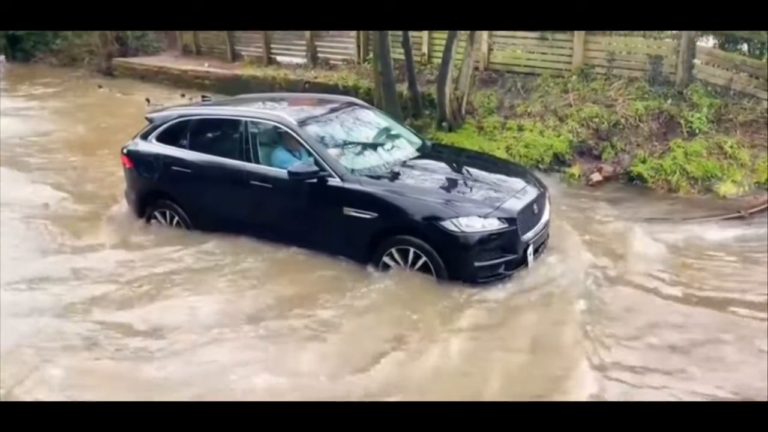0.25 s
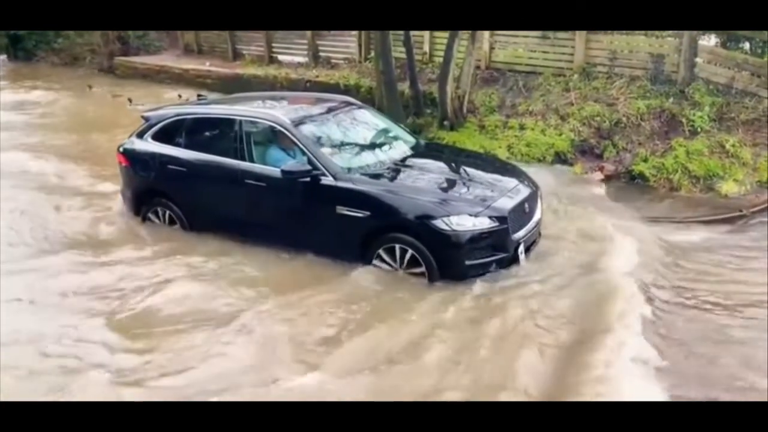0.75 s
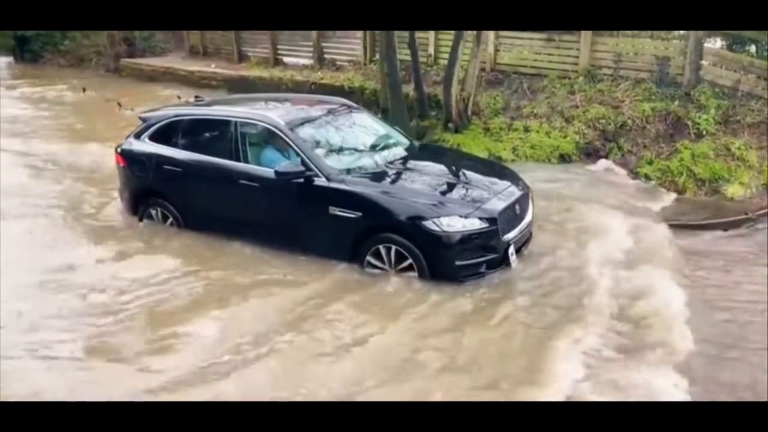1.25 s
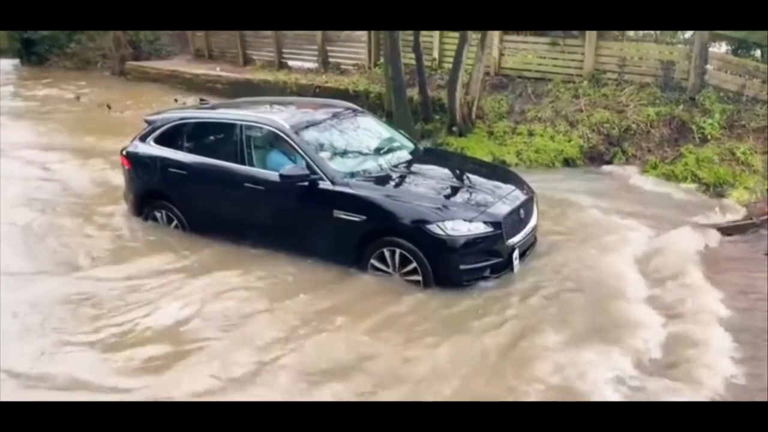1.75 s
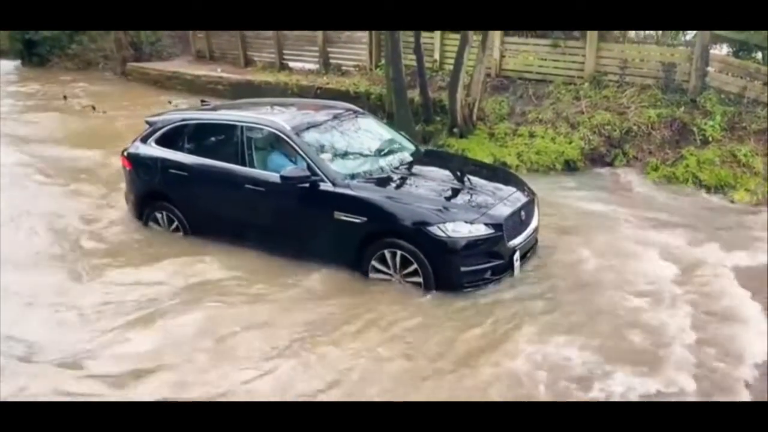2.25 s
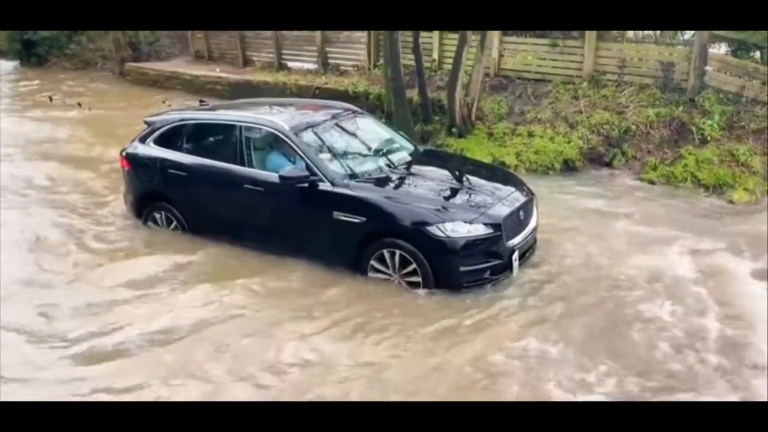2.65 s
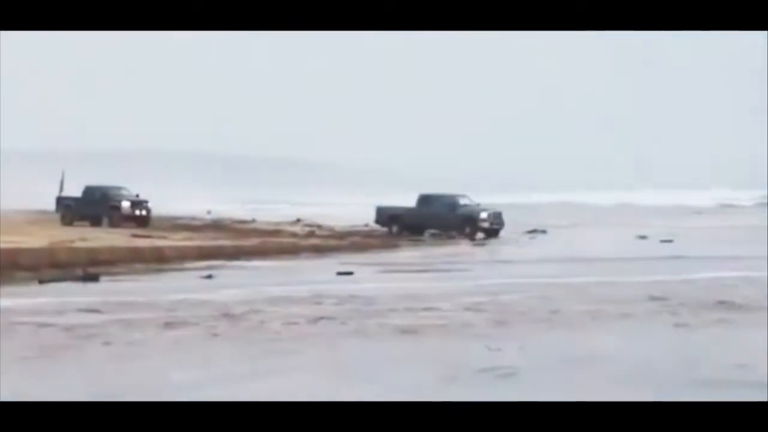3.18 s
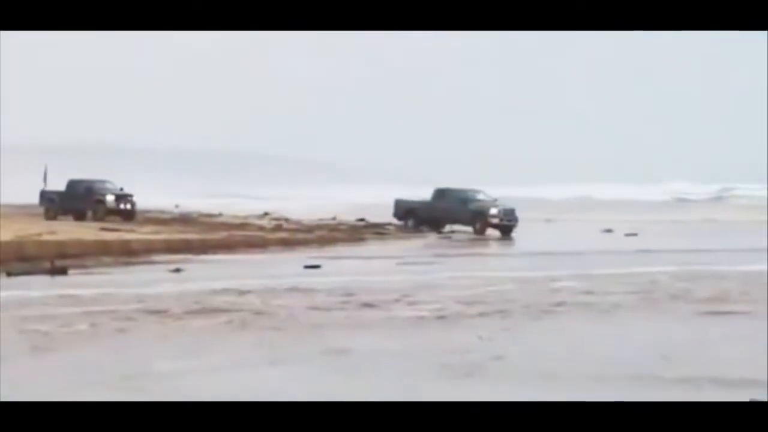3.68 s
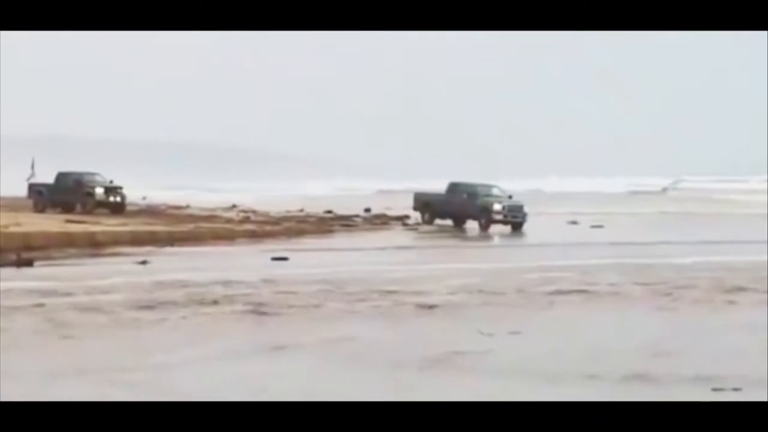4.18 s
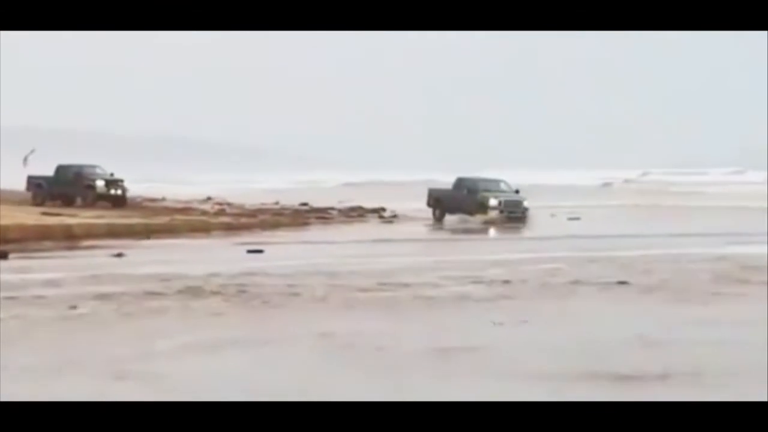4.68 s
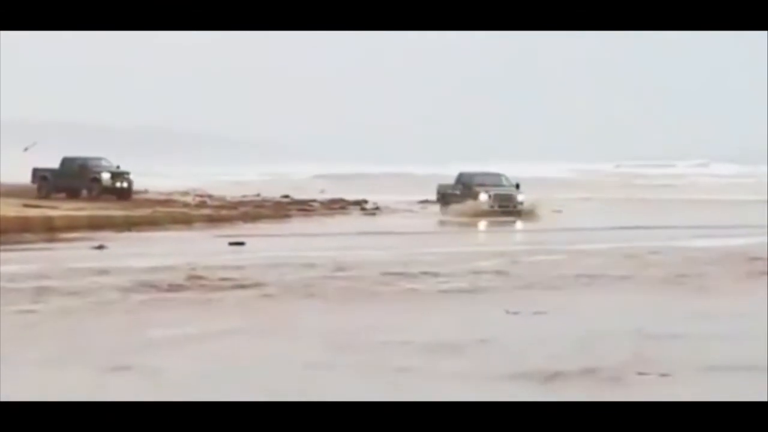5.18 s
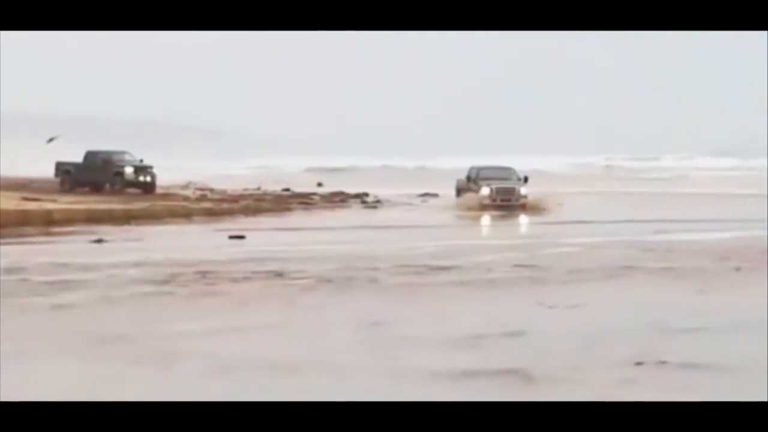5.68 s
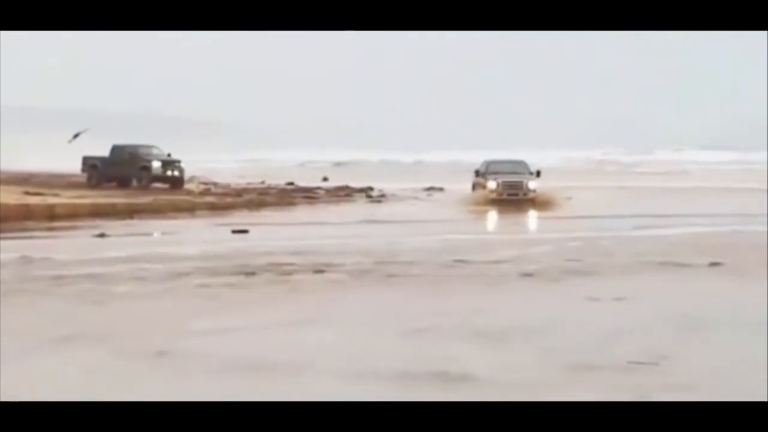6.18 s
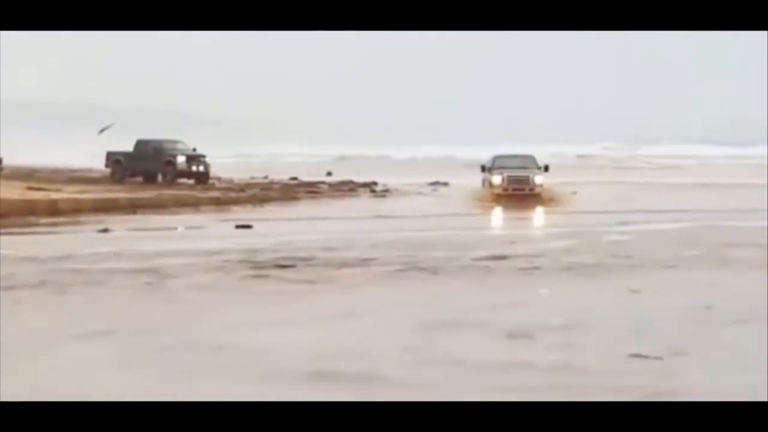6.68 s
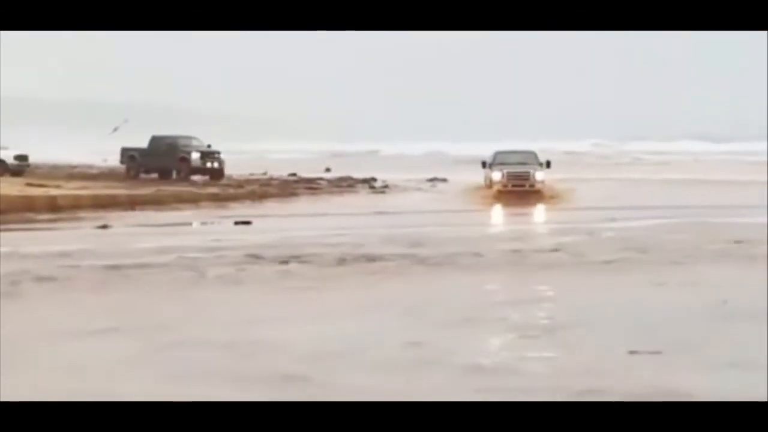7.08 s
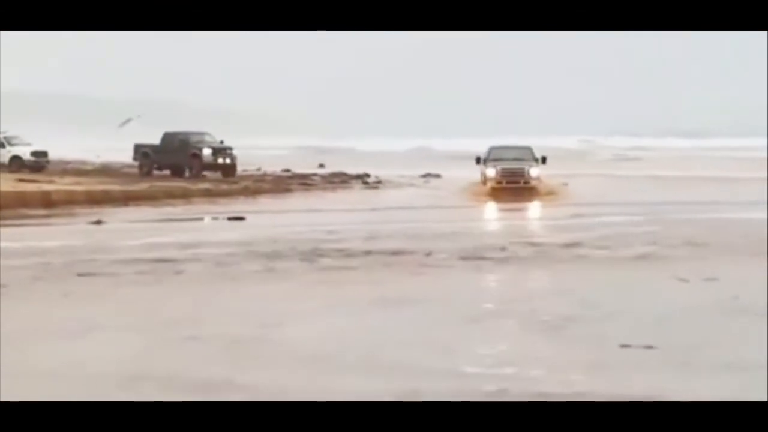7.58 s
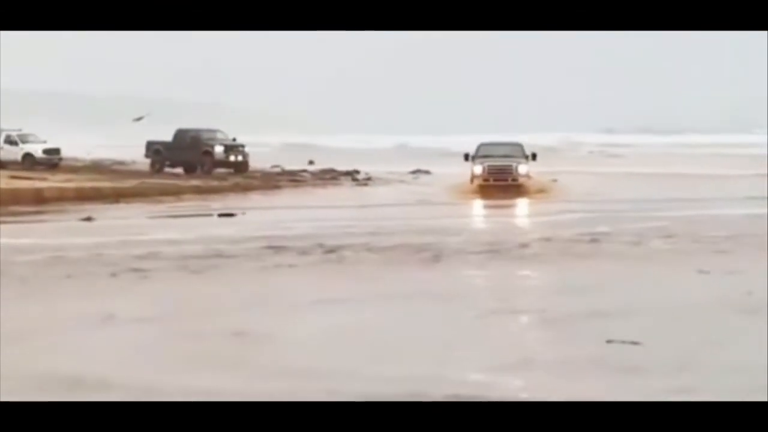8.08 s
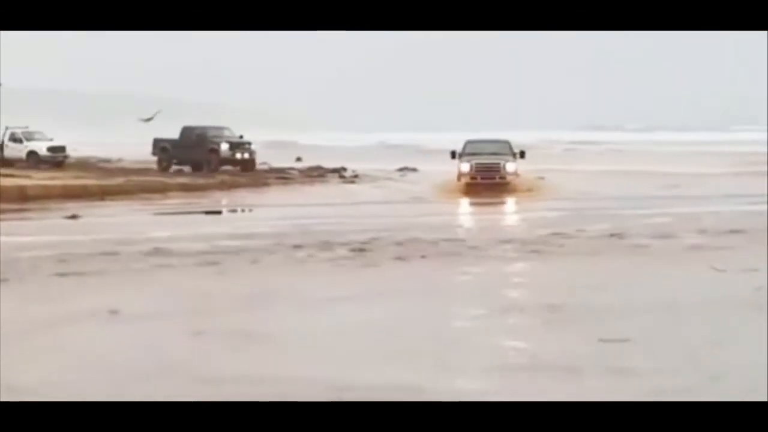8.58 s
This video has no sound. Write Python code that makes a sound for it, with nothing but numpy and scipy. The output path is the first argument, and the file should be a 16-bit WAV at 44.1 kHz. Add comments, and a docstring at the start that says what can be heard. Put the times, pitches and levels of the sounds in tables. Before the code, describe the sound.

A car wades through floodwater, churning and splashing, then wind and surf roar on a beach as a pickup engine hums nearer.

```python
"""A flooded road, microphone on the bank: a car wades through, and its bow wave churns, rushes and
sprays, with crests slapping down and air pockets gulping shut, then fades away.
Cut to a windy beach: wind and breakers roar while a distant pickup drives nearer through the shallows.
Its exhaust hum sinks, then climbs under load, with a second, steady engine behind it."""
import sys
import numpy as np
from scipy import signal
from scipy.fft import rfft, irfft, next_fast_len
from scipy.io import wavfile
from scipy.ndimage import uniform_filter1d, map_coordinates

SR = 44100
rng = np.random.default_rng(int(sys.argv[2]) if len(sys.argv) > 2 else 0)


def digitize_waveform(pressure):
    """Quantize a signal to 16-bit integers and store it at the path in sys.argv[1].

    Rows of a 2-D input are taken as channels; values are limited to [-1, 1].
    """
    field = np.atleast_2d(pressure).T
    bounded = np.clip(field, -1, 1)
    quanta = np.round(bounded * 32767).astype(np.int16)
    wavfile.write(sys.argv[1], SR, quanta)


N = 389844
TIME_S = np.arange(N) / SR


def amp(db):
    """Decibels to gain."""
    return 10 ** (np.asarray(db) / 20)


def unit(x):
    """Scale to rms 1."""
    return x / np.sqrt(np.mean(x ** 2) + 1e-20)


def along(points, hz):
    """Read (freq_hz, value) points on a log axis."""
    freqs, values = np.transpose(points)
    return np.interp(np.log(hz + 1), np.log(freqs + 1), values)


def curves(rows):
    """One value per sample for each column after the time."""
    times, *columns = np.transpose(rows)
    return [np.interp(TIME_S, times, column) for column in columns]


def wobble(rate):
    """A smooth random curve, rate knots a second."""
    return map_coordinates(rng.standard_normal(int(N * rate / SR) + 4), [TIME_S * rate])


def bump(crest_s, length_s):
    """A smooth rise from 0 to 1 and back."""
    return np.cos(np.pi * np.clip((TIME_S - crest_s) / length_s, -.5, .5)) ** 2


def swells(rows):
    """The dB that a series of swells adds to a level."""
    return sum(db * bump(crest_s, length_s) for crest_s, length_s, db in rows)


def filtered(x, response):
    """x times a complex response of frequency."""
    size = next_fast_len(N + SR // 2)
    return irfft(rfft(x, size) * response(np.fft.rfftfreq(size, 1 / SR)), size)[..., :N]


def patchy(depth_db, flutter_db):
    """Two noises sharing random patches of gain in time and pitch; the second also has its own."""
    spectra = signal.stft(rng.standard_normal((2, N)), nperseg=512)[2]
    patches = uniform_filter1d(rng.standard_normal(spectra.shape), size=4, axis=1)
    both, own = unit(uniform_filter1d(patches, size=8, axis=2))
    gains = amp([depth_db * both, depth_db * both + flutter_db * own])
    return np.array([unit(x) for x in signal.istft(spectra * gains, nperseg=512)[1][:, :N]])


def placed(pair, spectrum, width, side, lead):
    """Colour two unrelated signals and spread them over left and right, rms 1."""
    def colour(hz):
        angle = np.arctan(amp(along(width, hz)))
        return amp(along(spectrum, hz)) * [np.cos(angle), np.sin(angle)]
    common, apart = filtered(pair, colour)
    half = np.array([[.5], [-.5]])
    pan = lambda hz: amp(half * along(side, hz)) * np.exp(-1j * half * along(lead, hz))
    return unit(filtered(np.array([common + apart, common - apart]), pan))


def bubble(t, hz, cycles, rise):
    """A damped ring with a soft start; the pitch climbs as the bubble nears the surface."""
    age = t * hz / cycles
    phase = 2 * np.pi * hz * t * (1 + rise * np.minimum(age, 4) / 2)
    return np.sin(phase) * np.exp(-age) * (1 - np.exp(-5 * age))


def bubbles(count, pitch_hz, spread, cycles, scatter_db):
    """A stereo cloud of bubbles of random size, time and place, rms 1."""
    start, size, pan = rng.random((count, 3)).T[:, :, None]
    hz = np.clip(pitch_hz * np.exp(spread * rng.standard_normal((count, 1))), 200, 9500)
    n = np.arange(700)
    strength = amp(-scatter_db * np.log(size + 0.031))
    rings = bubble(n / SR, hz, cycles, rise=0.093) * (1 - n / len(n)) * strength
    index = ((start * N).astype(int) + n).ravel()
    sides = np.sqrt(1 - pan), np.sqrt(pan)
    return unit(np.array([np.bincount(index, (rings * gain).ravel(), N)[:N] for gain in sides]))


def knocks(rows, rise, rough):
    """Short low rings, each made ragged by turbulence."""
    out, t = np.zeros(N + SR), np.arange(SR // 4) / SR
    flutter = wobble(180)
    for start_s, hz, db, ring_s in rows:
        start = round(start_s * SR)
        ragged = 1 + rough * flutter[start:][:len(t)]
        out[start:][:len(t)] += amp(db) * bubble(t, hz, hz * ring_s, rise) * ragged
    return out[:N]


def engine(hz, db, orders, waver, shake_db):
    """Engine orders on a pitch and a level, with uneven speed and strength."""
    phase = 2 * np.pi * np.cumsum(hz * (1 + waver * wobble(25))) / SR
    return np.sqrt(2) * sum(amp(db + order_db + shake_db * wobble(18)) * np.sin(multiple * phase)
                            for multiple, order_db in orders)


# Stereo image from the bank of the ford
FORD_WIDTH = [(80, -3), (400, -6), (1000, 0), (1550, -10.5), (2600, -7.5), (5500, -2), (8000, -4.5)]  # freq_hz, unrelated_over_shared_db
FORD_BALANCE = [(100, 2.5), (330, 0), (700, -3.5), (1800, -1), (5500, -2.5), (9800, 0)]  # freq_hz, left_over_right_db
FORD_PHASE = [(90, 2.5), (330, 0.37), (900, 0.61), (1700, 2.08), (2100, 1.05), (3100, 2.27), (4200, 1.9),
              (5100, 3.1), (6000, 0.47), (7500, 1.2)]  # freq_hz, right_lead_rad
def at_ford(pair, spectrum):
    """Water noise as it reaches the microphone on the bank."""
    return placed(pair, spectrum, FORD_WIDTH, FORD_BALANCE, FORD_PHASE)


# Water in the wheel arches and troughs: crest_s, length_s, pitch_hz, level_db
SLOSHES = [(0.083, 0.18, 480, -41), (0.597, .24, 390, -45), (0.687, .12, 211, -39.5), (.75, 0.2, 440, -41),
           (0.917, .2, 280, -40.5), (1.59, .13, 280, -43.5), (1.907, 0.049, 660, -38),
           (1.988, 0.075, 270, -43), (2.1, .04, 190, -41)]
def sloshes(width_octaves=0.39, gurgle_db=1.5):
    """Water folds over a hollow: a short, gurgling rush around the hollow's pitch."""
    out = np.zeros((2, N))
    for crest_s, length_s, pitch_hz, db in SLOSHES:
        hollow = lambda hz: np.exp(-.5 * (np.log2((hz + 1) / pitch_hz) / width_octaves) ** 2)
        common, apart = unit(filtered(rng.standard_normal((2, N)), hollow))
        gurgle = amp(db - gurgle_db * np.tanh(wobble(54.7)))
        out += bump(crest_s, length_s) * gurgle * np.array([common + .4 * apart, common - .4 * apart])
    return out


# Air pockets in the wave: start_s, pitch_hz, level_db, ring_s
AIR_POCKETS = [(.038, 260, -27, 0.0069), (.05, 540, -31, .018), (.085, 426, -34, .018),
               (.106, 590, -32, 0.013), (.295, 195, -36, 0.0071), (.376, 170, -26.5, 0.012),
               (.398, 254, -32, 0.011), (.518, 174, -22, 0.0094), (.528, 270, -30, 0.0079),
               (.53, 670, -30, 0.013), (.571, 149, -34, .008), (.578, 270, -26, 0.0077),
               (.672, 153, -22, 0.0068), (.676, 270, -31, 0.009), (.716, 115, -28, .009),
               (.785, 468, -31, 0.01), (.89, 297, -34, 0.012), (1.083, 215, -33, .009),
               (1.325, 265, -33, 0.0088), (1.352, 205, -34, .01), (1.575, 285, -36, .018),
               (1.733, 271, -31, .006), (1.812, 135, -37, .01), (1.898, 648, -28, 0.015),
               (1.981, 320, -35, 0.011), (2.022, 150, -35, 0.011), (2.088, 124, -32, .012),
               (2.094, 243, -37, .009), (2.18, 163, -41, 0.024), (2.258, 300, -43, .009)]
def gulps(reverb_s=0.2):
    """Air pockets ring as they close and linger between the banks."""
    rings = knocks(AIR_POCKETS, rise=0.027, rough=0.16)
    t = np.arange(SR // 4) / SR
    banks = rng.standard_normal((2, len(t))) * amp(-60 * t / reverb_s)
    echo = signal.fftconvolve(rings[None], banks / np.linalg.norm(banks[0]), axes=1)[:, :N]
    return rings + amp(-13) * echo


SLAPS = [(.145, -43), (.525, -33), (.705, -32.5), (.745, -41), (.805, -38), (1.37, -41)]  # toppling crests: peak_s, level_db
SLAP_SPECTRUM = [(300, -16), (700, 4), (1100, 3), (1550, 1), (2100, -5), (3000, -10), (4300, -2),
                 (5900, -4), (7000, -17), (9800, -11)]  # their hiss: freq_hz, density_db
def slaps(attack_s=0.018, decay_s=0.053):
    """A crest falls back on the water: a quick burst of hiss and droplets."""
    burst = sum(amp(db) * np.exp(-np.maximum((peak_s - TIME_S) / attack_s, (TIME_S - peak_s) / decay_s))
                for peak_s, db in SLAPS)
    sheet = at_ford(patchy(1, flutter_db=1), SLAP_SPECTRUM)
    droplets = bubbles(count=7000, pitch_hz=2600, spread=0.48, cycles=1.7, scatter_db=4)
    return burst * (sheet + amp(-11) * droplets)


# Waves heaving against the car's body: crest_s, length_s, swell_db
HEAVES = [(.175, 0.13, 10), (.295, .17, 13.5), (.39, 0.11, 15), (.55, 0.25, 11.5), (.69, 0.14, 14.5),
          (.84, 0.13, 10), (1.06, 0.26, 11), (1.22, 0.11, 11), (1.35, .2, 9), (1.6, .22, 5),
          (1.77, 0.24, 11), (2.04, .24, 5)]
# The wave's three layers, heard from the bank: freq_hz, density_db
CHURN_SPECTRUM = [(20, -28), (45, -6.5), (75, 0), (130, -3.5), (220, -15), (400, -27), (900, -60)]
WASH_SPECTRUM = [(95, -26), (195, 0), (270, -1.5), (480, -3), (660, -2.5), (1000, -2.5), (1250, -6.5),
                 (1520, -0.5), (1750, -7), (2050, -4), (2400, -12.5), (2800, -6.5), (3500, -22),
                 (7000, -62)]
SPRAY_SPECTRUM = [(1200, -36), (2500, -19), (3200, 1), (4300, 1.5), (4900, 0.5), (5700, 1), (6800, -5.5),
                  (8500, -7), (9800, -6)]
def bow_wave(break_s=0.7, build_db_per_s=2, ebb_db_per_s=5, fade_s=2.097, fade_db_per_s=25.5):
    """One flow builds, breaks and spreads, driving lumpy churn, bubbly wash and fine spray."""
    since_s = TIME_S - break_s
    heave_db = swells(HEAVES)
    flow_db = build_db_per_s * np.minimum(since_s, 0) - ebb_db_per_s * np.maximum(since_s, 0)
    flow_db += 0.027 * heave_db
    wave_db = -37 + flow_db - fade_db_per_s * np.maximum(TIME_S - fade_s, 0)
    spray_db = wave_db + 0.042 * flow_db  # spray dies down sooner than the wash
    churn_db = wave_db - 11 + heave_db + 1.5 * np.tanh(wobble(24))
    churn = amp(churn_db) * at_ford(patchy(0.99, flutter_db=-3), CHURN_SPECTRUM)
    wash = amp(wave_db + 3) * at_ford(patchy(1.7, flutter_db=0.5), WASH_SPECTRUM)
    froth = amp(wave_db - 5) * bubbles(count=3000, pitch_hz=858, spread=0.614, cycles=5.8, scatter_db=2)
    spray = amp(spray_db - 0.7) * at_ford(patchy(0.7, flutter_db=0.8), SPRAY_SPECTRUM)
    drops = bubbles(count=7000, pitch_hz=4150, spread=0.36, cycles=1.2, scatter_db=5)
    return churn + wash + froth + spray + amp(spray_db - 10) * drops


# Stereo image on the open beach
BEACH_WIDTH = [(30, -6), (60, -15.5), (110, -25), (190, -17.5), (300, -17.5), (520, -3), (750, -9),
               (1200, -1), (1700, -1.5), (2200, -7), (3000, -0.5), (6000, 1), (8000, -3)]  # freq_hz, unrelated_over_shared_db
BEACH_BALANCE = [(250, 0.1), (1000, 1), (2200, 3), (4500, 5.5), (8000, -0.5)]  # freq_hz, left_over_right_db
BEACH_PHASE = [(200, -0.23), (500, 0.25), (1000, 0.28), (1400, .5), (1750, 2), (2200, 1.52), (2600, 2.5),
               (3200, 3.5), (5000, 3), (6500, -1)]  # freq_hz, right_lead_rad
def on_beach(pair, spectrum):
    """Wind and water noise as it reaches the microphone on the sand."""
    return placed(pair, spectrum, BEACH_WIDTH, BEACH_BALANCE, BEACH_PHASE)


# Surf and wheel wash as the pickup nears the microphone: time_s, level_db
APPROACH = [(2.65, -37), (2.72, -37), (3.28, -38), (3.8, -34), (4.64, -29.5), (6.62, -24), (8.8, -24)]
def approach():
    """The water's base level, and the same curve relative to the closest point."""
    water_db, = curves(APPROACH)
    return water_db, water_db - water_db.max()


GUSTS = [(2.7, 0.11, 2.5), (2.88, 0.05, 7), (4.35, 0.5, 1.5), (6.66, 0.14, 1.5), (7.61, .2, 1)]  # wind across the beach: crest_s, length_s, swell_db
ROAR_SPECTRUM = [(20, -16.5), (45, -23), (80, -12), (120, -5), (160, -2), (200, 0), (260, -1), (320, -3),
                 (400, -5.5), (520, -10), (900, -19), (2500, -60.5)]  # wind and breakers: freq_hz, density_db
def wind_roar(near_db):
    """Wind and breakers make a low, uneven roar that lifts in gusts."""
    level_db = -24 + 0.84 * near_db + swells(GUSTS) + 0.63 * wobble(18)
    return amp(level_db) * on_beach(patchy(0.42, flutter_db=5), ROAR_SPECTRUM)


# Surf in the shallows and the hiss above it: freq_hz, density_db
SURF_SPECTRUM = [(150, -20.5), (400, -4), (520, -8), (620, 0.5), (850, 0.5), (1150, -2.5), (1550, -5.5),
                 (2150, -2), (2800, -5), (3700, -9), (5000, -16.5), (6200, -28), (8000, -67)]
HISS_SPECTRUM = [(3000, -19), (5000, 3), (6200, 1), (7200, 1), (9900, -1)]
def surf(water_db, near_db):
    """Surf rushes, wheels throw droplets, and a thin, high hiss grows faster than both."""
    rush = on_beach(patchy(1.3, flutter_db=1.7), SURF_SPECTRUM)
    rush *= amp(water_db + 1.77 + 0.83 * wobble(20))
    droplets = bubbles(count=6500, pitch_hz=1750, spread=0.35, cycles=8, scatter_db=2.3)
    splash = amp(water_db - 8) * droplets * amp([[1.2], [-1.2]])  # a little to the left
    hiss_grain = patchy(5, flutter_db=2) * amp(4.5 * np.tanh(2 * wobble(40)))
    hiss = amp(water_db - 12 + 0.18 * near_db) * on_beach(hiss_grain, HISS_SPECTRUM)
    return rush + splash + hiss


# Thumps on the beach: start_s, pitch_hz, level_db, ring_s
THUMPS = [(5.471, 183, -8, 0.0065), (6.655, 205, -10, .025), (6.742, 325, -10, 0.0099)]
def thumps(low_cut_hz=105):
    """Dull knocks, dead centre, with no deep bass."""
    low_cut = signal.butter(2, low_cut_hz, 'highpass', fs=SR, output='sos')
    return signal.sosfilt(low_cut, knocks(THUMPS, rise=0.016, rough=0.22))


# Short hums over the surf: crest_s, length_s, crest_pitch_hz, level_db
HUMS = [(7.641, .12, 186, -21.5), (7.765, 0.23, 224, -20.5), (8.093, .22, 270, -30)]
def rising_hums(glide_hz_per_s=300):
    """Shaky low tones swell and die while they glide upward."""
    out = np.zeros(N)
    for crest_s, length_s, crest_hz, db in HUMS:
        pitch_hz = crest_hz + glide_hz_per_s * (TIME_S - crest_s)
        out += bump(crest_s, length_s) * engine(pitch_hz, db, [(1, 0)], waver=0.00697, shake_db=-1.3)
    return out


DRONE = [(2.61, 202.2, -27.5, -12), (6.2, 198, -34, -9), (7.2, 197.6, -34.5, -9), (8.1, 197.3, -34, -4.5),
         (8.84, 196.6, -31.5, 0)]  # the engine behind the pickup: time_s, pitch_hz, close_level_db, whine_db
WHINE_ORDERS = [(2, -14), (3, -3), (4, -7)]  # its overtones: pitch_multiple, level_db
def steady_engine(near_db):
    """A far engine holds its hum, whining more as it labours at the end."""
    pitch_hz, close_db, whine_db = curves(DRONE)
    hum = engine(pitch_hz, near_db + close_db, [(0.99, -2.5)], waver=0.0073, shake_db=-1)
    whine = engine(pitch_hz, near_db + close_db + whine_db, WHINE_ORDERS, waver=0.0042, shake_db=4)
    return hum + whine


REVS = [(2.61, 148.6), (3.2, 122.4), (3.9, 96.7), (5.6, 101), (6.4, 117), (6.8, 118.8), (7.3, 135.2),
        (7.95, 135.8), (8.1, 138.8), (8.65, 139.7), (8.84, 144.1)]  # the pickup eases into the water, then pulls again: time_s, firing_hz
PUSHES = [(6.34, 0.42, 7.5), (6.66, 0.34, 6.5), (7.12, 0.27, -1.5)]  # two exhaust swells ahead of the revs, then a dip: crest_s, length_s, swell_db
EXHAUST_ORDERS = [(.5, -30), (1, -2), (1.5, -26.5), (2, -16.5), (3, -25)]  # the exhaust from afar: firing_multiple, level_db
def pickup(near_db, full_load_hz=136.2, ease_db_per_hz=0.7):
    """Low exhaust orders carry over the surf, louder with nearness and revs."""
    firing_hz, = curves(REVS)
    load_db = -21.5 - ease_db_per_hz * np.maximum(full_load_hz - firing_hz, 0) + swells(PUSHES)
    return engine(firing_hz, near_db + load_db, EXHAUST_ORDERS, waver=0.00898, shake_db=0.9)


def scene(ford_end_s=2.59, beach_start_s=2.608, engine_lead_s=0.000056):
    """The ford, a blink of silence, then the beach, with the engines a little to the right."""
    ford = bow_wave() + gulps() + slaps() + sloshes()
    water_db, near_db = approach()
    beach = wind_roar(near_db) + surf(water_db, near_db) + thumps()
    right_first = lambda hz: np.exp(-1j * np.pi * hz * engine_lead_s * np.array([[1], [-1]]))
    engines = filtered(pickup(near_db) + steady_engine(near_db), right_first)
    leave = np.clip((ford_end_s - TIME_S) / .003, 0, 1)
    enter = np.clip((TIME_S - beach_start_s) / .007, 0, 1)
    return leave * ford + enter * (beach + engines + rising_hums())


def record(dry, top_hz=10050):
    """The microphone chain keeps nothing above its band limit."""
    return filtered(dry, lambda hz: np.clip((top_hz - hz) / 200 + .5, 0, 1))


dry = scene()
out = record(dry)
digitize_waveform(out)
```